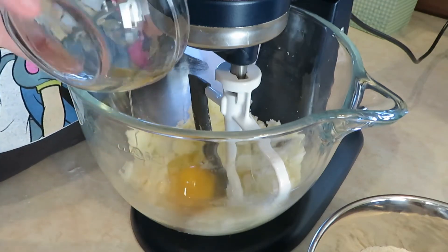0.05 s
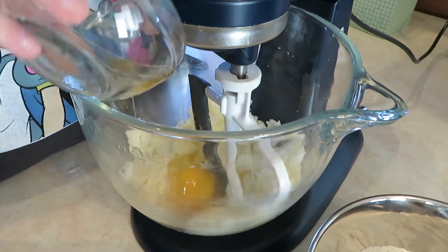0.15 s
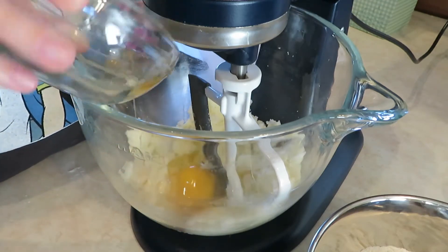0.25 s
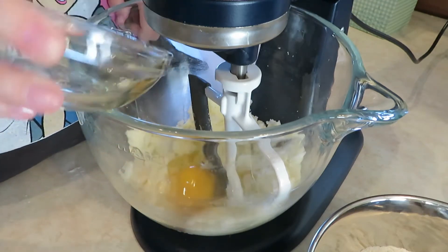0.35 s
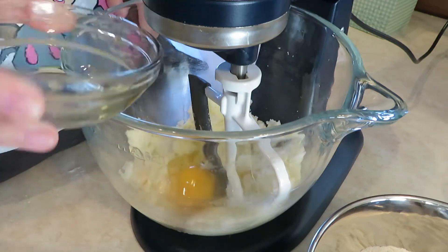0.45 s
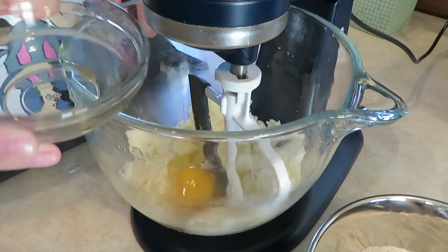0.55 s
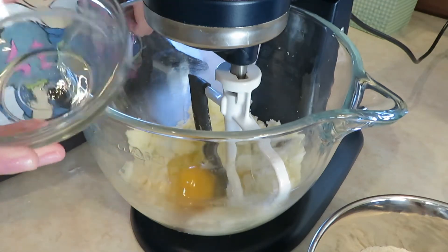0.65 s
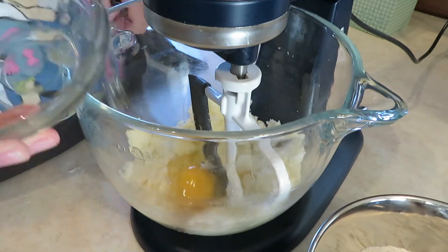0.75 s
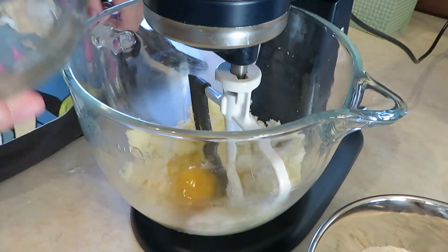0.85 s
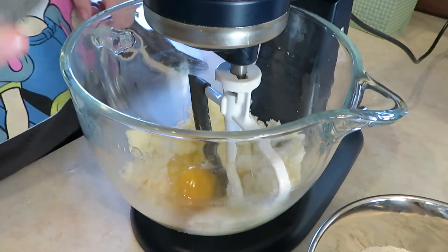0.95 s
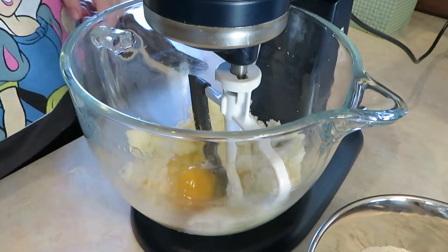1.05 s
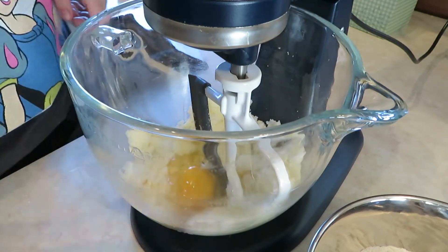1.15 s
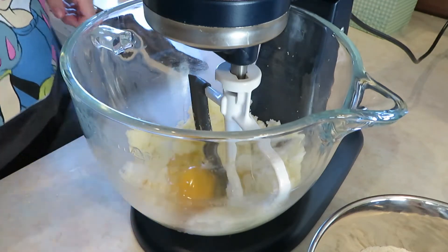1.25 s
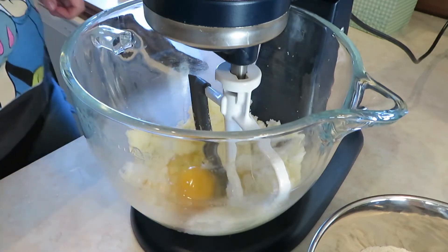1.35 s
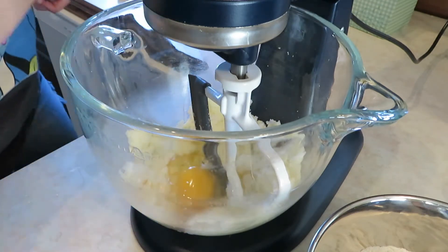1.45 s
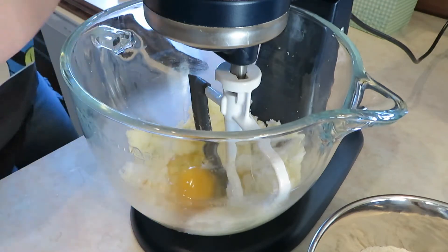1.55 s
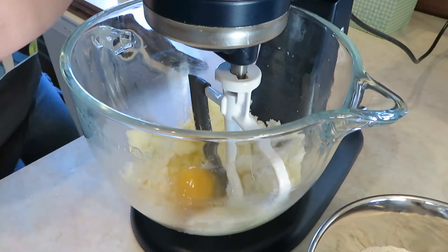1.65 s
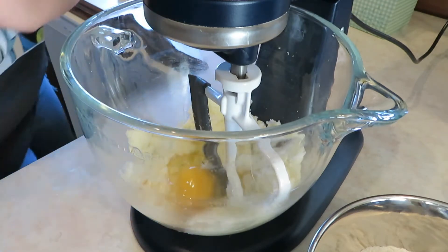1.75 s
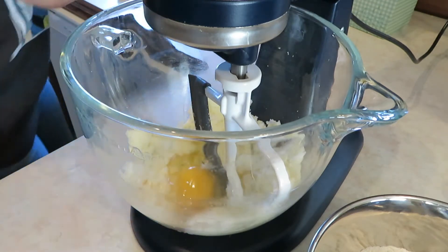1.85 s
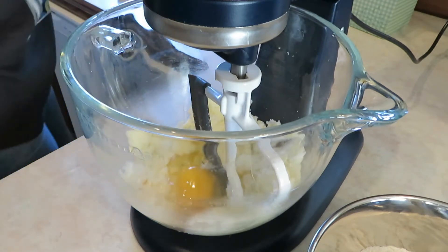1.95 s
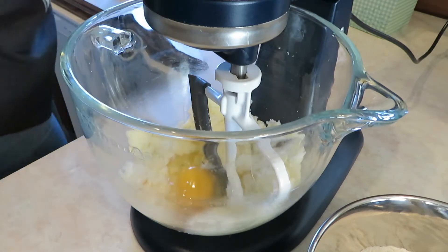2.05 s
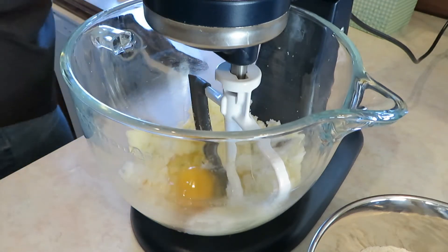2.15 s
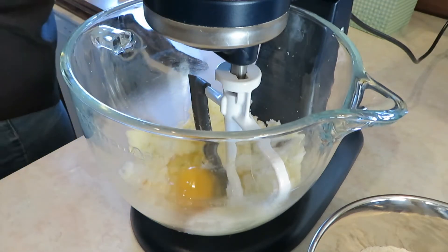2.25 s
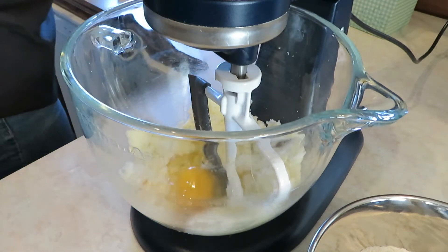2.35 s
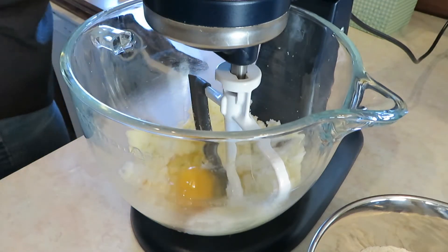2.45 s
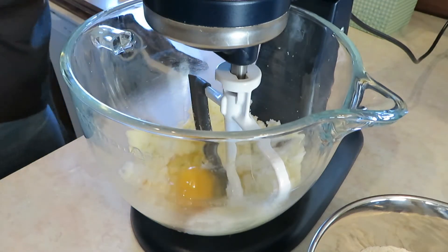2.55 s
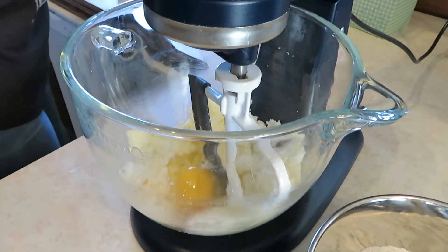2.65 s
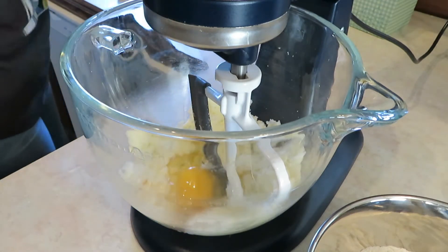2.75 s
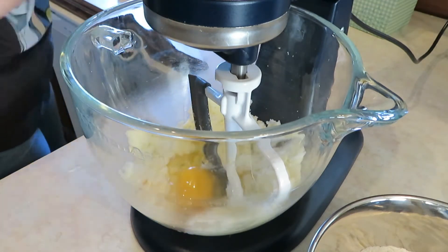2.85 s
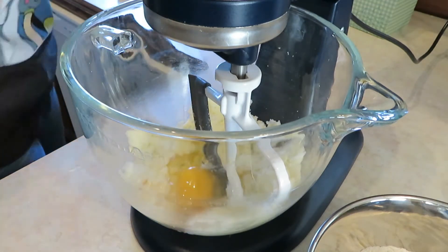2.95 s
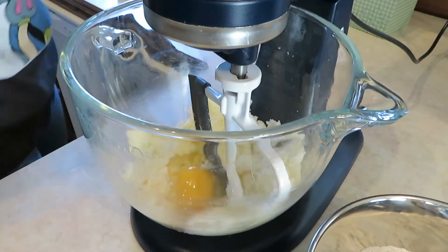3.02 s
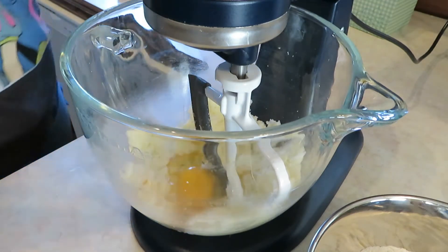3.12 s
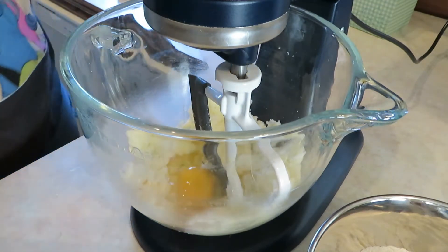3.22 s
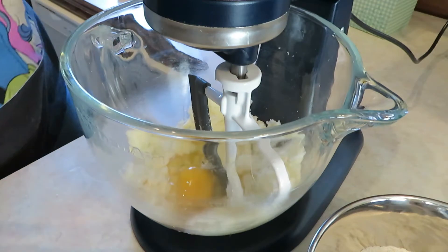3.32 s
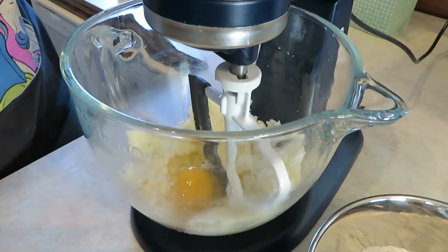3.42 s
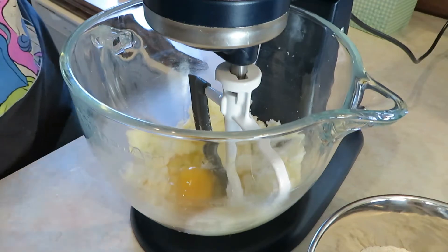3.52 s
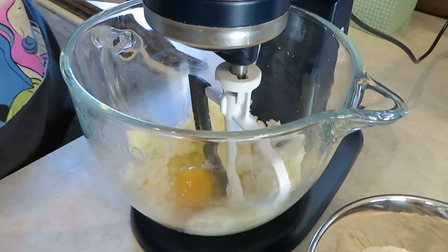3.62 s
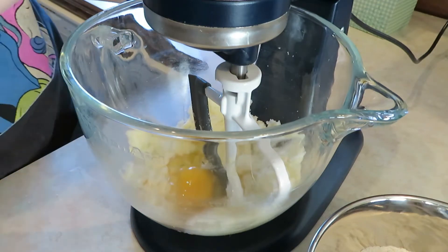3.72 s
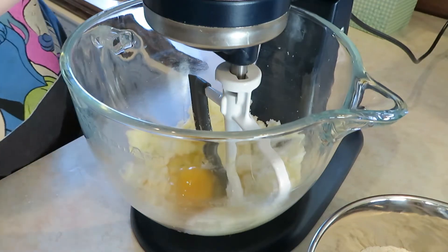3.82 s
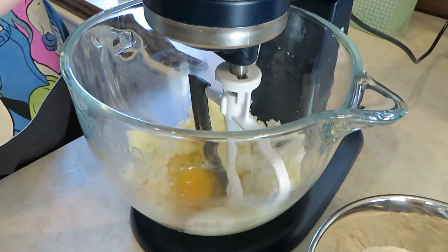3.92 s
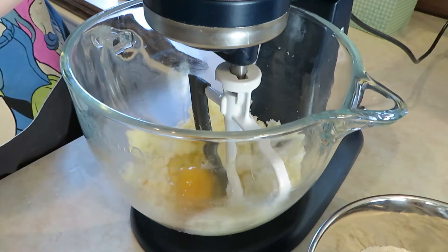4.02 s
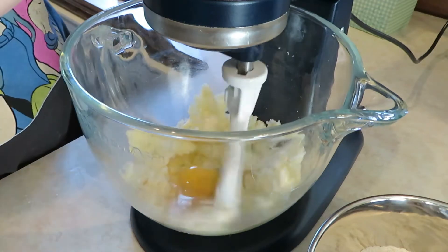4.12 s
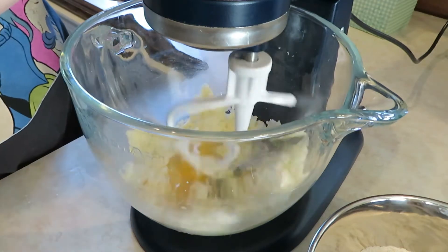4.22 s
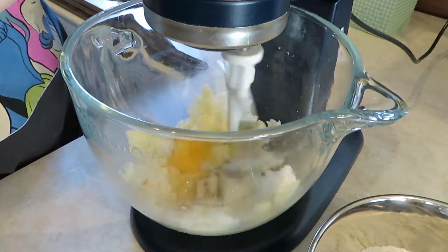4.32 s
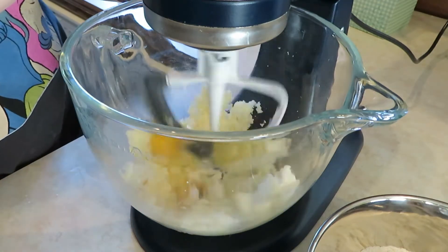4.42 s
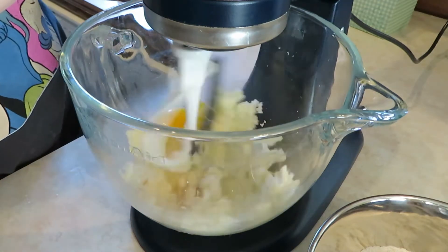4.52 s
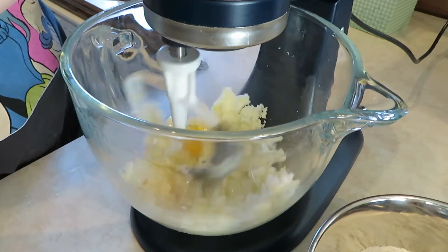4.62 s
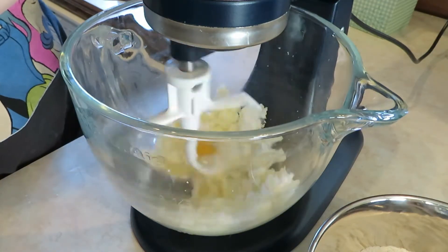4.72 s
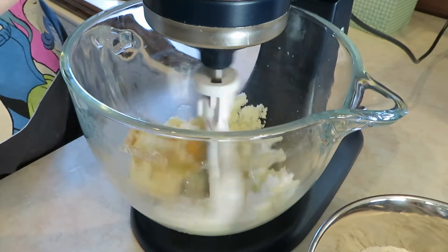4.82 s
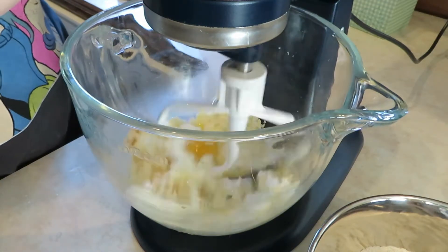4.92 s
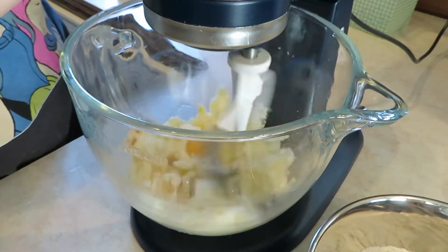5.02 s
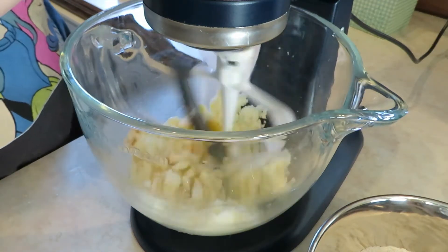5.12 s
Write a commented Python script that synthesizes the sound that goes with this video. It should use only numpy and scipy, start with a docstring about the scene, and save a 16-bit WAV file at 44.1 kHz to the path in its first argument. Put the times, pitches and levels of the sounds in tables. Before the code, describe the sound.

Ringing glass clink with chatter, soft slipper scuffs, a wooden set-down knock, then a lever click and whining mixer motor over fridge hum.

```python
"""A small glass bowl clinks on the rim of a mixing bowl, is carried off and set down on a far counter.
Each blow sets decaying tones ringing; noise bursts add the cracks and rattles.
Slippers scuff over the floor as bands of noise; a lever clicks and a stand mixer spins up with whining
gears (blurred tones), rumble, hiss and mains buzz. A refrigerator hums under it all in beating tones.
Two close microphones hear almost the same sound, made as a mid signal plus and minus a side signal."""
import sys
import numpy as np
from scipy import signal
from scipy.fft import rfft, irfft, next_fast_len
from scipy.io import wavfile
from scipy.ndimage import uniform_filter1d

SR = 44100
rng = np.random.default_rng(int(sys.argv[2]) if len(sys.argv) > 2 else 0)


def transcribe(u):
    """Save the signal u as a 16-bit wav file named by the first command-line argument.

    u: samples, shape (n,) or (channels, n), limited to [-1, 1]; the rate is SR.
    q: integer samples, one column per channel.
    """
    v = np.clip(np.atleast_2d(u).T, -1, 1)
    q = np.round(v * 32767).astype(np.int16)
    wavfile.write(sys.argv[1], SR, q)


N = 228123
T = np.arange(N) / SR  # time of every sample [s]
MAINS_HZ = 59.9


def amp(db):
    """Turn decibels into a gain."""
    return 10 ** (np.asarray(db) / 20)


def rms_one(x):
    """Scale a sound to an rms level of 1."""
    return x / np.sqrt(np.mean(x ** 2) + 1e-20)


def over_time(points):
    """Join (time, value) points by straight lines, one value per sample."""
    seconds, values = np.transpose(points)
    return np.interp(T, seconds, values)


def at_hz(points, hz):
    """Read a spectrum between its points; pitch is spaced by ratio, as the ear hears it."""
    point_hz, point_db = np.transpose(points)
    return np.interp(np.log(hz + 1), np.log(point_hz), point_db)


def coloured(x, spectrum):
    """Filter a sound by a (frequency, level) spectrum."""
    size = next_fast_len(N)
    hz = np.arange(size // 2 + 1) * SR / size
    return irfft(rfft(x, size) * amp(at_hz(spectrum, hz)), size)[..., :N]


def drift(rate_hz):
    """Random wandering with rms 1: white noise smoothed twice, quicker at a higher rate."""
    r = np.exp(-2 * np.pi * rate_hz / SR)
    smooth = signal.lfilter([1], [1, -2 * r, r * r], rng.standard_normal(N + SR))
    return rms_one(smooth[SR:])  # the first second only settles the filter


def soften(x, hz):
    """A soft contact lasts longer and so loses its treble."""
    return signal.sosfilt(signal.butter(2, hz, fs=SR, output="sos"), x)


def resonance(x, hz, width_hz):
    """One resonance: lets a narrow band through, with gain 1 at its top."""
    r = np.exp(-np.pi * width_hz / SR)
    feedback = [1, -2 * r * np.cos(2 * np.pi * hz / SR), r * r]
    return signal.lfilter([(1 - r * r) / 2, 0, (r * r - 1) / 2], feedback, x)


def double_resonance(x, hz, width_hz):
    """The same resonance twice in a row, for steeper sides."""
    return resonance(resonance(x, hz, width_hz), hz, width_hz)


def strike(times, levels_db, modes, spread_db=0, tilts=0):
    """Every blow sets each mode (one decaying tone) ringing, with some luck in its strength."""
    at, out = np.round(np.array(times) * SR).astype(int), np.zeros(N)
    luck = rng.standard_normal((len(at), len(modes)))
    for k, (hz, level_db, t60) in enumerate(modes):
        brightness_db = tilts * np.log2(hz / 3000)
        clicks = np.full(N, 1e-18)  # not quite zero, which keeps the filter fast
        clicks[at] = amp(levels_db + level_db + spread_db * luck[:, k] + brightness_db)
        r, w = amp(-60 / (t60 * SR)), 2 * np.pi * hz / SR
        tone = signal.lfilter([0, np.sin(w)], [1, -2 * r * np.cos(w), r * r], clicks)
        out += (-1) ** k * tone  # every other mode starts downward
    return out


def burst(times, levels_db, t60, spectrum):
    """Coloured noise that starts at each blow and dies quickly."""
    blows = np.full(N, 1e-18)
    blows[np.round(times * SR).astype(int)] = amp(levels_db)
    dying = soften(signal.lfilter([1], [1, -amp(-60 / (t60 * SR))], blows), hz=900)
    return dying * rms_one(coloured(rng.standard_normal(N), spectrum))


def kitchen(x, gap_s):
    """Reverberation: noise that dies away at its own pace in each band, after a first gap."""
    # time each band takes to fade by 60 dB: (frequency [Hz], t60 [s])
    fade_times = [(125, 0.51), (300, 0.48), (700, 0.6), (1500, 0.6), (3000, 0.32), (6000, 0.12),
                  (12000, 0.05)]
    t = np.arange(int(.7 * SR)) / SR
    tail = 0
    for hz, t60 in fade_times:
        band = signal.butter(2, [hz / 1.5, hz * 1.5], "band", fs=SR, output="sos")
        noise = signal.sosfilt(band, rng.standard_normal(len(t)))
        tail = tail + noise * amp(-60 * t / t60) * (t > gap_s)
    return signal.fftconvolve(x, tail / np.sqrt(np.sum(tail ** 2)))[:N]


def room_tone():
    """Refrigerator hum, each line throbbing and wavering, over the steady air of the room: mid and side."""
    # hum lines, each beating with a close neighbour: (multiple of mains [times], level [dB],
    # beat rate [per s], depth [0-1], a weakest moment [s])
    hum_lines = [(1, -43, 0.658, 0.47, 2.073), (2, -45, 3.1, 0.19, 5.9)]
    # colour of the room's air noise: (frequency [Hz], relative level [dB per Hz])
    air_colour = [(12, -60), (20, -27), (26, -23), (45, -8.5), (70, -7), (87, -5), (119, -2), (191, -6.5),
                  (232, -5.5), (306, -13.5), (342, -10), (705, -20.5), (3080, -31), (12800, -49.5),
                  (15500, -62.5)]
    # how wide the air noise is: (frequency [Hz], side minus mid level [dB])
    air_width = [(60, -21), (110, -24.5), (200, -9.5), (380, -2.5), (700, -2.5), (1290, 0), (2380, -1),
                 (4400, -0.5), (8120, -0.5), (15000, -3.5)]
    mains = 2 * np.pi * np.cumsum(MAINS_HZ * (1 + 0.011 * drift(2.75))) / SR
    hum = 0
    for multiple, level_db, beats, depth, weakest_s in hum_lines:
        beat = np.abs(1 - depth * np.exp(2j * np.pi * beats * (T - weakest_s)))
        hum = hum + amp(level_db + 1.36 * drift(3.8)) * beat * np.sin(multiple * mains)
    air = amp(-42.5) * rms_one(coloured(rng.standard_normal((2, N)), air_colour))
    rattle = amp(-52.0) * rms_one(resonance(rng.standard_normal(N), hz=331.0, width_hz=25))
    return hum + rattle + air[0], coloured(air[1], air_width)


def slippers():
    """Soft soles tap down and rub the floor: dense grit under each stroke."""
    # strokes, swelling and fading: (peak time [s], relative level [dB], rise [dB per s], fall [dB per s])
    strokes = [(0.01, -55, 104, 90), (1.42, -49.5, 155, 118), (1.62, -65.5, 82, 46), (1.77, -53.5, 55, 69),
               (1.87, -50, 503, 143), (2.21, -47.5, 589, 88), (3.06, -58.5, 62, 43), (3.38, -64, 308, 131),
               (3.73, -35.5, 104, 122)]
    # colour of the rubbing: (frequency [Hz], relative level [dB per Hz])
    rub_colour = [(290, -35), (500, -19.5), (552, -7.5), (976, -7), (1630, 2), (1830, -0.5), (2640, 1),
                  (4670, -7), (15000, -34)]
    # heels touching down: (time [s], relative level [dB])
    heels = [(0.051, -24.5), (1.364, -27), (1.409, -31), (1.444, -27), (1.852, -32.5), (2.204, -28),
             (3.372, -28)]
    # tones of sole and floor: (frequency [Hz], relative level [dB], t60 [s])
    sole_modes = [(715, -1.5, 0.023), (1110, 3, 0.013), (1510, -1, 0.02), (2080, -5, 0.018),
                  (2880, -7, .015)]
    linger_s = 0.01  # a stroke stays this long at its peak
    grit = rng.standard_normal(N) * amp(0.41 * drift(36))
    loudness = 0
    for peak_s, peak_db, rise, fall in strokes:
        before_db = rise * (peak_s - T)
        after_db = fall * np.maximum(T - peak_s - linger_s, 0)
        loudness = loudness + amp(peak_db - np.where(T < peak_s, before_db, after_db))
    rub = loudness * rms_one(coloured(grit, rub_colour))
    heel_s, heel_db = np.transpose(heels)
    return rub + soften(strike(heel_s, heel_db - 14.5, sole_modes, spread_db=6.5), hz=3900)


def housing(x):
    """The cast shell of the mixer sings at its own resonances."""
    # shell resonances: (frequency [Hz], nominal width [Hz], relative level [dB])
    shell = [(253.4, 43, -1), (299, 42, 5), (342, 47, -3.5), (824, 32, -4), (1107, 98, 1.5),
             (1500, 500, -8.5), (1860, 44, -6.5), (2675, 110, -18), (3030, 99, -14), (4090, 220, -17)]
    out = 0
    for hz, width, db in shell:
        # two filters in a row narrow the peak, so each is made wider
        out = out + amp(db) / np.sqrt(width) * double_resonance(x, hz, 1.42 * width)
    return out


def mixer():
    """Gear teeth whine with the speed and rattle the housing; brushes hiss; the field buzzes at twice mains."""
    # motor current, heard as mains buzz; a surge, the climb, coasting, a new pull: (time [s], level [dB])
    current = [(4.165, -21.5), (4.24, -28.5), (4.47, -26.5), (4.52, -39.5), (5.04, -39.5), (5.13, -35),
               (5.173, -28)]
    # how often gear teeth meet: (time [s], frequency [Hz])
    tooth_rate = [(4.16, 700), (4.26, 880), (4.36, 1120), (4.5, 1450), (4.65, 1420), (4.85, 1250),
                  (5.0, 1440), (5.05, 1380), (5.17, 1450)]
    # first three multiples of the tooth rate: (relative level [dB])
    multiples_db = [0, -4, -18]
    # colour of the rumble: (frequency [Hz], relative level [dB per Hz])
    rumble_colour = [(24, -41), (40, -20), (112, -4.5), (210, -5), (302, -2.5), (461, -12), (795, -7),
                     (954, -14.5), (1140, -6), (2730, -15), (5000, -35.5), (6500, -55), (11000, -120)]
    # colour of the brush hiss: (frequency [Hz], relative level [dB per Hz])
    brush_colour = [(2060, -20), (3500, -6), (4120, -7.5), (5120, -16), (5620, -11), (8850, -16.5),
                    (10900, -16), (13900, -22), (15500, -39)]
    # whistles of the fan: (frequency [Hz], width [Hz], level against the hiss [dB])
    whistles = [(6150, 64, -23), (8000, 46, -18), (10800, 170, -19)]
    switch_on_s = 4.165
    buzz_db, mesh_hz = over_time(current), over_time(tooth_rate)
    pull_db = buzz_db + 30  # current against a reference of -30 dB
    octaves = np.log2(mesh_hz / 1400)  # speed against a 1400 Hz tooth rate

    turn = 2 * np.pi * np.cumsum(mesh_hz) / SR
    whine = 0
    for multiple, level_db in enumerate(multiples_db, 1):
        blur_hz = 40 * multiple  # uneven teeth blur each multiple into a band
        in_step = (1 + drift(blur_hz)) * np.sin(multiple * turn)
        out_of_step = drift(blur_hz) * np.cos(multiple * turn)
        whine = whine + amp(level_db) * (in_step + out_of_step)
    whine = whine + amp(26.5) * housing(whine)  # louder where the teeth meet a resonance

    mains = 2 * np.pi * MAINS_HZ * T
    throb = 1 + 0.057 * np.sin(2 * mains) + 0.033 * np.sin(mains) + 0.31 * np.sin(2 * np.pi * 302.5 * T)
    teeth = throb * amp(2.0 * drift(100)) * rng.standard_normal(N)
    broad = rms_one(coloured(teeth, rumble_colour))
    rumble = rms_one(rms_one(housing(teeth)) + amp(6.5) * broad)
    # the worktop shakes under the base
    shake = amp(-39.5) * rms_one(double_resonance(teeth, hz=64.3, width_hz=50))
    # the clearest tone of the shell
    sing_hz = 1163 * (1 + .012 * drift(8.84))
    sing = amp(-35 + 2.2 * drift(5.9)) * np.sin(2 * np.pi * np.cumsum(sing_hz) / SR)

    hiss = rms_one(coloured(throb * rng.standard_normal(N), brush_colour))
    hiss = hiss + sum(amp(db) * rms_one(resonance(hiss, hz, width)) for hz, width, db in whistles)
    hum = np.sin(2 * mains) + amp(-43) * np.sin(4 * mains) + amp(-9.0) * np.sin(6 * mains)
    buzz = np.sqrt(2) * amp(1.2 * drift(6.0)) * hum

    # whine and body follow a share of the current's swing; all but the buzz grow louder with speed
    whine = amp(-37 + 0.49 * pull_db + 3.5 * octaves) * whine
    body = amp(0.047 * pull_db + 1.5 * octaves) * (amp(-27) * rumble + sing + shake)
    hiss = amp(-50.5 + 5 * octaves) * hiss
    return (T >= switch_on_s) * (whine + body + hiss + amp(buzz_db) * buzz)


def lever():
    """Short plastic clicks with a brief rattle; a brighter one has stronger high modes."""
    # lever and small plastic ticks: (time [s], relative level [dB], brightness [dB per octave])
    ticks = [(3.3924, -55, 13), (4.1667, -16.5, -8), (4.1691, -40, -15.5), (4.1767, -41, -14),
             (4.182, -39, -15), (4.3544, -60, 20.5), (4.476, -25.5, 3.5), (4.501, -13.5, 0.5),
             (4.833, -39, 3)]
    # tones of the plastic: (frequency [Hz], relative level [dB], t60 [s])
    plastic_modes = [(323, -9.5, 0.052), (1860, 6, 0.047), (2470, 13.5, 0.008), (2940, -23, 0.019),
                     (3550, 2, 0.021), (4100, -9, 0.0098), (5700, 9, 0.0055), (7800, 10.5, 0.0062),
                     (9000, -20, 0.0028), (9700, 9, 0.0018), (13000, -4, .003)]
    # colour of the rattle after each click: (frequency [Hz], relative level [dB per Hz])
    rattle_colour = [(1470, -7), (2500, -5), (3270, -6.5), (4200, -20.5), (7340, -21), (9080, -24.5),
                     (15500, -27)]
    tick_s, tick_db, bright = np.transpose(ticks)
    clicks = strike(tick_s, tick_db - 17.0, plastic_modes, spread_db=0.5, tilts=bright)
    return clicks + burst(tick_s, tick_db - 8.0, 0.078, rattle_colour)


def counter():
    """The bowl lands on a wooden top and rocks: a short crack and the soft boom of the wood."""
    # landings, as single knocks or close pairs, some brighter than others:
    # (time [s], relative level [dB], brightness [dB per octave])
    thuds = [(2.532, -4, 1), (2.5343, -2.5, 0), (2.547, -13.5, -3), (2.602, 1.5, 3.5), (2.605, -3, 1),
             (2.628, -5, 0.5)]
    # tones of the wood: (frequency [Hz], relative level [dB], t60 [s])
    wood_modes = [(167.6, -9.5, 0.24), (275, 1.5, 0.02), (342, 0, 0.079), (448, -1.5, 0.037),
                  (485, -2.5, 0.11), (577, -1.5, 0.073), (766, 3, 0.017), (1010, 1.5, 0.01),
                  (1700, 2, 0.0079), (2320, 2.5, 0.0069), (3320, -10.5, 0.0043), (4460, -21, 0.0057),
                  (380, 3.5, 0.022)]
    # colour of the contact itself: (frequency [Hz], relative level [dB per Hz])
    crack_colour = [(88, -45), (150, -15.5), (330, -5), (739, -6.5), (956, -13), (1540, -7), (3260, -30.5),
                    (4980, -58), (9460, -57), (12000, -59), (15600, -88), (22000, -120)]
    thud_s, thud_db, bright = np.transpose(thuds)
    boom = strike(thud_s, thud_db - 12.0, wood_modes, spread_db=1, tilts=bright)
    boom = soften(soften(boom, hz=4200), hz=5500)
    return burst(thud_s, thud_db - 10.5, 0.023, crack_colour) + boom


def bowls():
    """One hard touch: a bright knock and both glasses ringing; then softer bumps. Returns contacts and ring."""
    # glass on glass: (time [s], relative level [dB])
    clinks = [(0.306, 7.5)]
    # tones of the mixing bowl, some in beating pairs: (frequency [Hz], relative level [dB], t60 [s])
    big_modes = [(506, -19, .3), (1273, -7, .9), (2165, -13, .7), (2207, -5.5, .7), (2762, 0, .55),
                 (3413, -19, .65), (3423, -23, .6), (3671, -21, .55), (4183, -30, .22), (4878, -33, .6),
                 (4888.5, -33, .6), (6900, -40, .14), (8161, -35, .17), (10920, -43, .2)]
    # tones of the small bowl: (frequency [Hz], relative level [dB], t60 [s])
    small_modes = [(1206, -3.5, .85), (1421, -19, .18), (1750, -18, .2), (2024, -7, .16), (2363, -15, .15),
                   (2961, -22, .25)]
    # short tones of the hard, bright knock, strongest near 2 kHz:
    # (frequency [Hz], relative level [dB], t60 [s])
    knock_modes = [(311, -18.5, 0.035), (725, -20, 0.027), (1335, -5, 0.004), (2006, 5.5, 0.009),
                   (3200, -2, .006), (3900, -12, 0.011), (5700, -2, 0.0045), (6900, -15, .011),
                   (9300, -14, .006), (11000, -14, .014)]
    # the small bowl bumps along the rim and chatters:
    # (time [s], relative level [dB], brightness [dB per octave], loss per touch [dB])
    bumps = [(0.333, 3, 6.5, 2), (0.455, -1, 2.5, 6.5), (0.526, -12, 0, 10), (0.578, -19, -1.5, 5),
             (0.589, -16.5, -2, 3.5)]
    # tones of the bumps: (frequency [Hz], relative level [dB], t60 [s])
    rim_modes = [(274, -5, 0.025), (514, -4, 0.022), (690, -4.5, 0.012), (1230, -1.5, 0.013),
                 (1615, 5, 0.0029), (2220, -10, 0.039), (3170, -14.5, 0.014)]
    gripped_s = 0.595  # the fingers start to close on the small bowl
    chatter_s = .006  # basic step of the chatter
    clink_s, clink_db = np.transpose(clinks)
    pressed = np.clip((T - clink_s[0]) / .0018, 0, 1)  # force builds while the rims are in contact
    free = np.clip(1 - (T - gripped_s) / .03, .1, 1)  # the grip leaves a tenth of the ring
    ring = strike(clink_s, clink_db - 19.5, big_modes)
    ring = ring + free * strike(clink_s, clink_db - 21.0, small_modes)
    graze = soften(strike([.293], -43, big_modes), hz=3500)  # a faint first touch of the rims

    knock = pressed * soften(strike(clink_s, clink_db - 3, knock_modes, spread_db=1), hz=6000)
    knock = knock + amp(-13.5) * np.roll(knock, round(0.0035 * SR))  # echo off the worktop and wall

    touches = []
    for at, db, tilt, loss_db in bumps:
        for k in range(6):
            late = rng.uniform(0, 0.693) * (k > 0)  # uneven gaps after the first touch
            touches.append((at + chatter_s * (k + late), db - loss_db * k, tilt))
    touch_s, touch_db, bright = np.transpose(touches)
    chatter = strike(touch_s, touch_db - 6.5, rim_modes, spread_db=6, tilts=bright)
    chatter = soften(soften(chatter, hz=2580), hz=3400)
    return knock + chatter, pressed * ring + graze


def scene():
    """Near and far sources in the kitchen, joined from mid and side into two channels."""
    # colour given to the side signal of the sources: (frequency [Hz], gain [dB])
    side_colour = [(60, -37), (110, -56.5), (200, -59.5), (380, -34), (700, -37), (1290, -33.5),
                   (2380, -30.5), (4400, -10.5), (8120, -9), (15000, 4)]
    tone_mid, tone_side = room_tone()
    steady, far = slippers() + mixer(), counter()
    contacts, ring = bowls()
    near = contacts + lever()
    direct = near + ring + far + steady
    # how much of each source goes into the reverberation
    wet = amp(-15) * near + amp(-20) * ring + amp(-11.0) * far + amp(-12.5) * steady
    mid = direct + kitchen(wet, gap_s=0.0071)
    side = coloured(kitchen(direct + wet, gap_s=.001), side_colour)
    return mid + tone_mid + (side + tone_side) * [[1], [-1]]


def record(dry):
    """Gain control ducks after loud peaks and creeps back; overloads clip; lows and top are cut."""
    level_db = 10 * np.log10(uniform_filter1d(np.mean(dry ** 2, axis=0), size=256) + 1e-12)
    climb_db = 4.9 * T  # recovery of 4.9 dB a second
    excess_db = 0.78 * np.maximum(level_db + 12.0, 0)  # a share of whatever passes -12 dB
    duck_db = np.maximum.accumulate(excess_db + climb_db) - climb_db
    r = np.exp(-1 / (0.041 * SR))  # the gain reacts over 41 ms
    levelled = dry * amp(-signal.lfilter([1 - r], [1, -r], duck_db))
    levelled = signal.sosfilt(signal.butter(2, 38, "high", fs=SR, output="sos"), levelled)
    top_cut = signal.cheby2(12, 70, 15600, fs=SR, output="sos")  # 70 dB down from 15.6 kHz up
    return signal.sosfilt(top_cut, np.clip(levelled, -1, 1))


dry = scene()
out = record(dry)
transcribe(out)
```